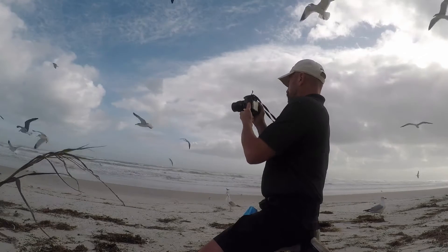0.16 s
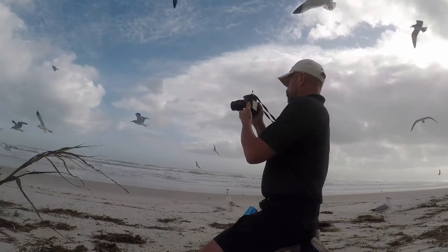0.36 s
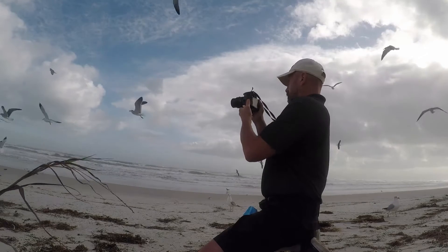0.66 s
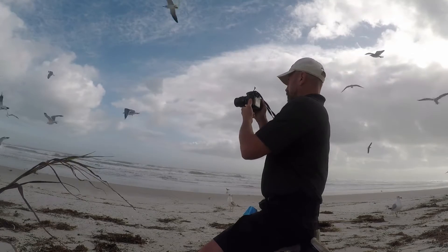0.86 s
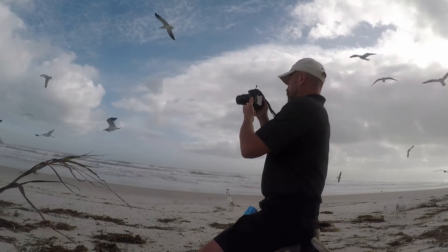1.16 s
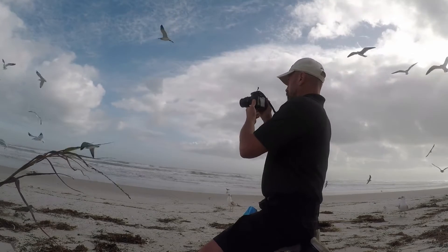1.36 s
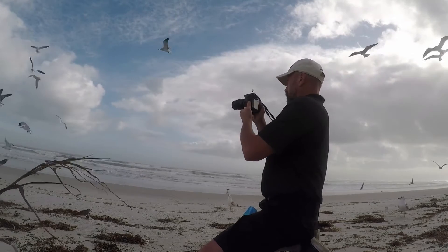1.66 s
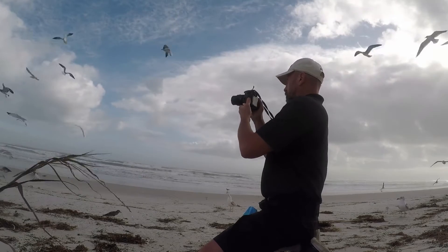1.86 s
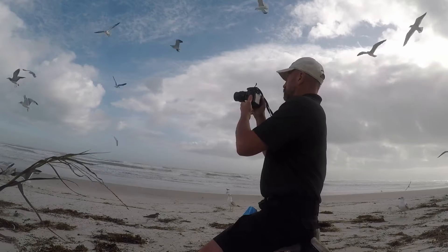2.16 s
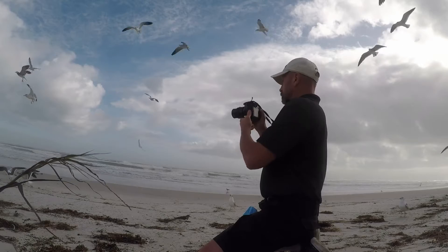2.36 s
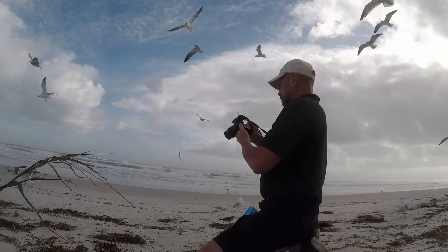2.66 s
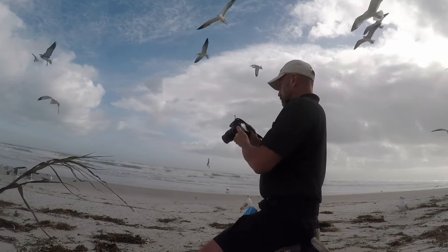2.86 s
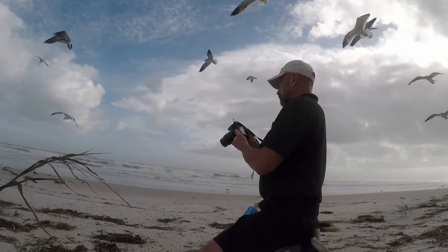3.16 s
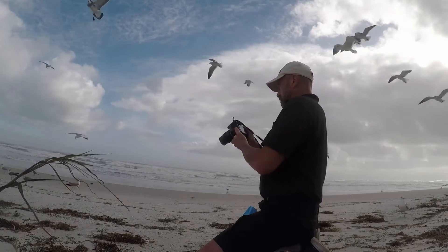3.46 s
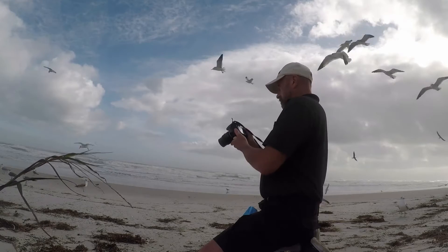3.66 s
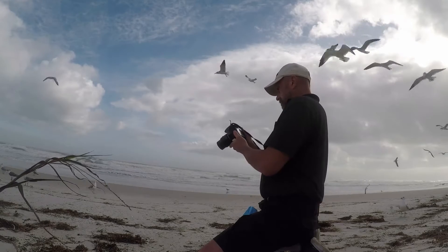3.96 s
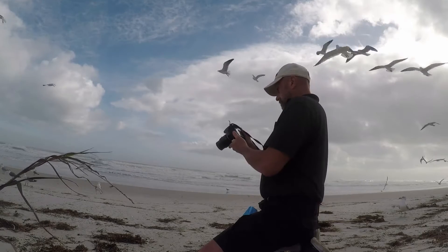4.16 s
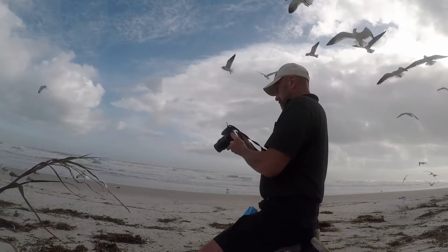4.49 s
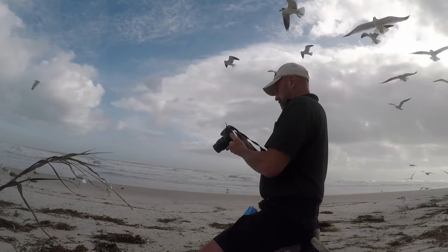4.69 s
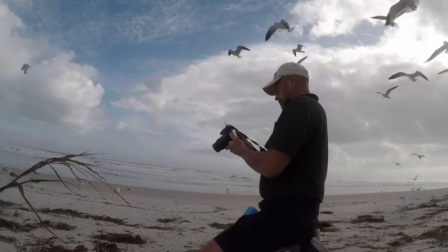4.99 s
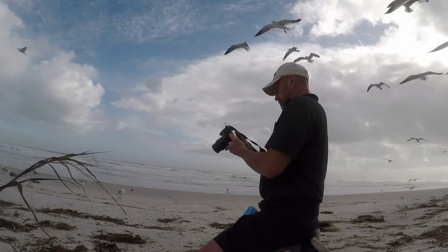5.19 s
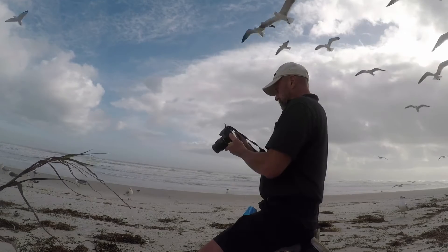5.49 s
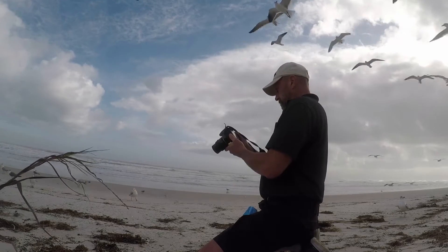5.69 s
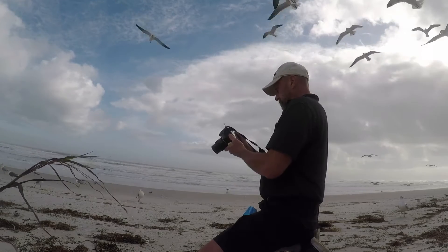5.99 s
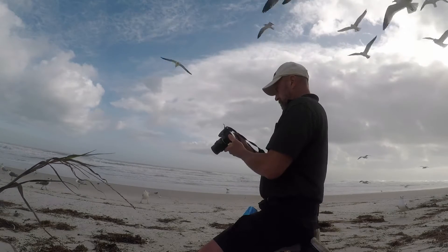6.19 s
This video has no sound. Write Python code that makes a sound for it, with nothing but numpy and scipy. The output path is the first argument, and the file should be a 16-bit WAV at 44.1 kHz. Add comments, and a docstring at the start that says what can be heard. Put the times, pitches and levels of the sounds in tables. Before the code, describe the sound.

A deep, steady roar of distant breakers and wind fills a beach throughout, heard wide in stereo, with a lighter hiss of foam on the sand. From the start a camera shutter clatters in an even burst, about five shots a second, with a faint whirr of gears, stopping at about 2.4 seconds. A nearer wave swells softly at around 0.7 seconds. From 1.4 to 1.9 seconds a gull on the left gives a shrill, breaking squeal. A gull on the right then gives four clear, short, falling cries at about 2, 2.4, 3.3 and 4.6 seconds, the second much fainter and briefer. Two more nearer waves break at about 4.2 and 5.3 seconds, the last one fuller, and the hiss of foam begins to ebb near 6 seconds.

```python
"""A windy beach, heard on a stereo pair: far breakers roar and foam hisses up the sand throughout.
From the start a camera clatters through a burst, five frames a second, and a nearer wave breaks.
At 1.4 s a gull on the left squeals, its voice breaking as the two halves of its syrinx beat.
From 2 s a gull on the right gives four clear falling cries; the camera stops at 2.4 s.
Two more nearer waves break around 4.2 and 5.3 s, and the foam begins to ebb."""
import sys
import numpy as np
from scipy import signal
from scipy.fft import rfft, irfft
from scipy.io import wavfile
from scipy.ndimage import uniform_filter1d, minimum_filter1d

SR = 44100
rng = np.random.default_rng(int(sys.argv[2]) if len(sys.argv) > 2 else 0)


def log_audio(samples):
    """Write samples as a 16-bit WAV file to the path given in sys.argv[1]."""
    # one column per channel
    frames = np.atleast_2d(samples).T
    # limit to full scale, then quantise
    limited = np.clip(frames, -1, 1)
    pcm = np.round(limited * 32767).astype(np.int16)
    wavfile.write(sys.argv[1], SR, pcm)


N = 279594

# deep roar of far breakers and wind: (frequency [Hz], relative density [dB])
ROAR_SPECTRUM = [(11, -47), (18, -12), (86, 1.5), (180, -1.5), (416, -10.5), (1180, -28), (1460, -37),
                 (1700, -40), (2210, -77.5), (3740, -120)]
# hiss of foam on the sand: (frequency [Hz], relative density [dB])
FOAM_SPECTRUM = [(900, -15.5), (1500, -1), (2200, 2), (2900, 0.5), (3600, 1.5), (4800, -2.5), (6000, 0.5),
                 (6700, -3.5), (7700, -9.5), (8200, -20), (9700, -18.5), (11000, -29), (13200, -33.5),
                 (14000, -38.5)]
# the sea at the two microphones: (frequency [Hz], likeness [0-1], left lead [rad], left minus right [dB])
SEA_AT_MICS = [(35, .08, 0, 0), (90, .5, 0, .4), (190, .65, .1, -.7), (350, .85, .2, -1.6),
               (600, .73, .7, -1), (900, .66, 1.1, 4.7), (1200, .52, .7, 6.8), (1900, .38, .4, 3.7),
               (2700, .62, 0, 4.7), (4200, .7, .2, 3.3), (5200, .58, .6, 2), (6500, .68, 1.2, .2),
               (8000, .45, 3, -.5), (10000, .1, 2.6, -1.8)]
# waves breaking nearer by: (peak time [s], level [dB], centre [Hz], spray level [dB], spray centre [Hz])
NEAR_WAVES = [(.65, -27, 950, -45.5, 1970), (4.15, -27.5, 335, -44, 7000), (5.3, -20.5, 332, -47.5, 3900)]
# whirr of the winding gears: (frequency [Hz], relative density [dB])
GEAR_SPECTRUM = [(1200, 13.5), (1900, 11.5), (2800, 6.5), (3600, -18), (6500, -12), (8100, -2),
                 (9000, -3.5), (10500, -19), (12500, -24), (14000, -28)]
# strength of the shutter, frame by frame: (level [dB])
FRAME_LEVELS = [-30, -28.5, -29.5, -30.5, -29.5, -30, -29.5, -30.5, -31, -28, -28, -29.5]
# mirror and curtain impacts in a frame: (delay [s], level [dB], rattle time [s], low mode boost [dB])
SHUTTER_CONTACTS = [(0, -0.5, 0.00073, -6), (.0245, -15.5, 0.00072, 11.5), (.0425, -5.5, .0012, 0.5),
                    (.0685, -13, .001, -9), (.081, -8, .0014, 1), (.0995, -6.5, .0015, 0),
                    (.123, -15, .0007, 3)]
# modes of the camera body: (frequency [Hz], width [Hz], level [dB], left minus right [dB])
BODY_MODES = [(2600, 700, 1.5, 3), (4080, 500, 2.5, 1), (5630, 540, -14, -8), (6580, 390, 2.5, 1.5),
              (7200, 440, -8, -9), (8900, 700, -17.5, -14), (10500, 830, -29, -13), (12600, 1200, -23, -2)]
# the housing's shadow on the far microphone: (frequency [Hz], loss at full side [dB], phase advance [rad])
MIC_SHADOW = [(2400, 20, 1.1), (2800, 20, 0.74), (3600, 21, 1), (4400, 8, 0.44), (5200, -2, -0.29),
              (7600, 5.5, -0.2), (10100, -12.5, -1.54)]
# throat of the squealing gull: (frequency [Hz], gain [dB])
SQUEAL_RESONANCE = [(1800, -12), (2500, 1), (6300, 5), (7300, 8.5), (8300, -33), (11000, -42)]
# notes of a breaking voice: (start [s], length [s], pitch [Hz], bend [Hz], bend lateness [1 = even glide],
# level [dB], fade over the note [dB], beat [Hz], beat depth [0-1], beat delay [s], octave level [dB],
# roughness [0-1], stutter depth [0-1], side [+1 = left])
SQUEAL_NOTES = [(1.427, 0.043, 2740, 44, 0.5, -21.5, -8, 610, 0.37, 0.01, -9, 0.2, 0.3, 0.82),
                (1.444, 0.036, 6650, -450, 1.1, -36.5, -6, 600, .4, 0, -40, 0.7, 0.3, 0.85),
                (1.461, 0.043, 3566, 249, 0.75, -11, 11.5, 530, 0.16, 0, -20, 0.02, 0.25, 0.91),
                (1.464, 0.026, 5490, 230, 3, -25.5, -7, 620, .14, 0, -43, 0.12, 0.1, 0.72),
                (1.5, .094, 6054, 230, 2.9, -13.5, 7, 1100, 0.02, 0, -52, 0.04, 0.1, 0.89),
                (1.59, 0.035, 6300, -62, 1, -28, 14, 1260, .1, 0, -50, 0.1, 0.8, 0.87),
                (1.578, 0.02, 4840, 150, 1, -29, -6, 560, 0.05, 0, -32, 0.2, 0.2, 1),
                (1.593, 0.043, 5030, -400, 6, -29, 0.5, 560, 0.08, 0, -32, 0.35, 0.2, 0.89),
                (1.596, 0.033, 3870, 50, 1, -29.5, 3, 560, 0.05, 0, -32, 0.1, 0.15, 1),
                (1.627, 0.056, 3900, -470, 0.48, -23.5, 0, 550, .02, .0066, -31, 0.1, 0, 0.89),
                (1.686, .028, 3410, 50, 2, -29, -6, 490, 0, 0, -19, 0.1, 0, .72),
                (1.706, 0.16, 3475, -160, 2.36, -23, 13, 490, 0.44, 0.06, -22, 0.12, 0.1, 0.69),
                (1.775, .078, 2480, -110, 1.6, -36, 3, 490, 0, 0, -20, 0.3, 0.3, .72),
                (1.968, 0.022, 4100, 220, 1, -31.5, 1, 418, .5, 0.0074, -17, 0.8, 0.4, -0.47),
                (2.517, 0.12, 4100, -240, 3.7, -39.5, 11, 500, .02, 0, -17, 0.1, 0, -.5),
                (3.239, 0.024, 3950, 499, 3.7, -34.5, -8, 1120, 0.3, 0, -17, .55, 0.1, -.3)]
# throat of the crying gull: (frequency [Hz], gain [dB])
CRY_RESONANCE = [(2150, 5), (2600, 4.5), (4400, -1), (5200, 7), (6700, 0.5), (7300, 4.5), (7900, 1),
                 (9600, -21.5), (10500, -19), (11000, -38), (12800, -43), (13800, -31)]
# clear cries: (start [s], scoop time [s], scoop depth [Hz], time to crest [s], length [s], pitch [Hz],
# crest pitch [Hz], dip [Hz], sag [Hz/s], sag easing time [s], level [dB], crest level [dB], dip [dB],
# fade [dB/s], octave boost [dB], brightness [dB/octave], crest brightness [dB/octave], side [+1 = left])
CRY_NOTES = [(1.979, 0.0082, 150, 0.12, 0.28, 2624, 2630, 61, 4400, 0.52, -23.5, -32, 1, 90, 1, -2.5, 0, -0.29),
             (2.441, 0.029, 424, 0.038, 0.092, 2386, 2375, 10, 2200, .5, -42, -44.5, 1, 110, 7, -6, -3.5, -.5),
             (3.251, 0.0096, 150, .102, 0.34, 2590, 2617, 34.5, 1930, 0.71, -25.5, -26, 0.5, 93, 1, -0.5, 0.5, -0.3),
             (4.6, 0.024, 224, 0.15, 0.286, 2535, 2556, 50, 4400, 0.256, -24.5, -26, 3, 144, 1, -1, 0.5, -0.21)]

FIRST_FRAME_S, FRAME_PERIOD_S = .0865, .1968
SIDES = np.array([[1], [-1]])   # left and right microphone


def from_db(db):
    """Decibels as amplitude."""
    return 10 ** (np.asarray(db) / 20)


def rms_one(x):
    """The signal scaled to rms 1."""
    return x / np.sqrt(np.mean(x ** 2) + 1e-20)


def at_hz(points, hz):
    """The columns of a spectrum at the frequencies hz."""
    f, *columns = np.transpose(points)
    return [np.interp(np.log(np.maximum(hz, 1)), np.log(f), c) for c in columns]


def bandpass(low_hz, high_hz):
    """A gentle band filter."""
    return signal.butter(2, [low_hz, high_hz], "band", fs=SR, output="sos")


def drift(rate, size):
    """A smooth random wander of spread 1 that changes about rate times a second."""
    hz = np.fft.rfftfreq(2 * SR + size, 1 / SR)
    white = rfft(rng.standard_normal(2 * SR + size))
    return rms_one(irfft(white / (1 + (hz / rate) ** 2)))[:size]


def span_of(start, length, attack_s, release_s):
    """Samples of an event, the time since its start, and a gate that opens and closes smoothly."""
    t = np.arange(int(length * SR)) / SR
    opening = np.clip(np.minimum(t / attack_s, (length - t) / release_s), 0, 1)
    return int(start * SR) + np.arange(len(t)), t, np.sin(np.pi / 2 * opening) ** 2


def sea_noise(spectrum):
    """Noise from a wide shore: one part reaches both microphones, the rest is each one's own."""
    hz = np.fft.rfftfreq(N, 1 / SR)
    alike, lead, balance_db = at_hz(SEA_AT_MICS, hz)
    white = rfft(rng.standard_normal((3, N)))
    shared = np.sqrt(alike) * white[2] * np.exp(.5j * lead * SIDES)
    own = np.sqrt(1 - alike) * white[:2]
    colour = from_db(at_hz(spectrum, hz)[0] + .5 * balance_db * SIDES)
    return rms_one(irfft((shared + own) * colour, N))


def surf(roar_db=-13.5, swell_db=.68, foam_db=-37, surge_db=.6, ebb_from_s=5.73, ebb_db_per_s=3.5):
    """Breakers roar far out; foam hisses up the sand, then dies down as the wave draws back."""
    ebb_db = ebb_db_per_s * np.maximum(np.arange(N) / SR - ebb_from_s, 0)
    roar = from_db(roar_db + swell_db * drift(.8, N)) * sea_noise(ROAR_SPECTRUM)
    foam = from_db(foam_db - ebb_db + surge_db * drift(25, N)) * sea_noise(FOAM_SPECTRUM)
    return roar + foam


def near_waves(swell_s=.36, spray_ratio=1.42):
    """Closer to the microphones, each wave swells, throws a hiss of spray and sinks again."""
    t, out = np.arange(N) / SR, np.zeros((2, N))
    water, froth = sea_noise(ROAR_SPECTRUM), sea_noise(FOAM_SPECTRUM)
    for peak_s, level_db, centre_hz, spray_db, spray_hz in NEAR_WAVES:
        rush = rms_one(signal.sosfilt(bandpass(centre_hz / 2, centre_hz * 2), water))
        spray = rms_one(signal.sosfilt(bandpass(spray_hz / spray_ratio, spray_hz * spray_ratio), froth))
        swell = np.exp(-.5 * ((t - peak_s) / swell_s) ** 2)
        out += swell * (from_db(level_db) * rush + from_db(spray_db) * spray)
    return out


def gears(level_db=-42, grain_db=3, delay_s=.004, winding_s=.125):
    """A small motor winds the camera during each frame, with a fine grainy whirr."""
    hz, running = np.fft.rfftfreq(N, 1 / SR), np.zeros(N)
    for start in FIRST_FRAME_S + FRAME_PERIOD_S * np.arange(len(FRAME_LEVELS)):
        at, _, gate = span_of(start + delay_s, winding_s, attack_s=.013, release_s=.018)
        running[at] += gate
    teeth = rng.standard_normal((2, N)) * from_db(grain_db * drift(400, N))
    whirr = irfft(rfft(teeth) * from_db(at_hz(GEAR_SPECTRUM, hz)[0]), N)
    return from_db(level_db) * running * rms_one(whirr)


def shutter(detune=.018, low_below_hz=5000, spread_db=1.2):
    """Each frame is the same chain of small impacts; each briefly rings every mode of the camera body."""
    t, out = np.arange(SR // 60) / SR, np.zeros((2, N))
    for frame, frame_db in enumerate(FRAME_LEVELS):
        start = FIRST_FRAME_S + FRAME_PERIOD_S * frame
        for delay, contact_db, rattle_s, low_db in SHUTTER_CONTACTS:
            at = int((start + delay) * SR)
            impact = from_db(frame_db + contact_db) * t / rattle_s * np.exp(1 - t / rattle_s)
            for hz, width, mode_db, pan_db in BODY_MODES:
                # loose parts rattle, so the phase wanders and the mode is broad
                walk = np.cumsum(rng.standard_normal((2, len(t))), axis=1)
                wander = uniform_filter1d(walk * np.sqrt(2 * np.pi * width / SR), size=24, axis=1)
                ring_hz = hz * (1 + detune * rng.standard_normal())
                phase = 2 * np.pi * (ring_hz * t + rng.random((2, 1))) + wander
                ring_db = mode_db + low_db * (hz < low_below_hz) + spread_db * rng.standard_normal()
                out[:, at:at + len(t)] += from_db(ring_db + .5 * pan_db * SIDES) * impact * np.sin(phase)
    return out


def beach_scatter(x, echo_db=-27, t60_s=.3):
    """Sand and dune add a faint, short tail to the direct sound."""
    t = np.arange(SR // 2) / SR
    tail = rng.standard_normal((2, len(t))) * from_db(-60 * t / t60_s)
    tail /= np.sqrt(np.sum(tail ** 2, axis=1, keepdims=True))
    return x + from_db(echo_db) * signal.fftconvolve(x, tail, axes=1)[:, :N]


def partial(hz, side, right_lag_s):
    """One gliding line at the pair: the far microphone hears it later and in the housing's shadow."""
    phase = 2 * np.pi * (np.cumsum(hz) / SR + rng.random())
    shade_db, advance = at_hz(MIC_SHADOW, hz)
    right_phase = phase - 2 * np.pi * hz * right_lag_s + np.sign(side) * advance
    left = from_db(-shade_db * max(-side, 0)) * np.sin(phase)
    right = from_db(-shade_db * max(side, 0)) * np.sin(right_phase)
    return np.array([left, right])


def gull_squeals(jitter=.058, rasp=.51, flutter=.82, hoarse_db=-4, stutter_hz=86.6,
                 beat_rise_s=.0037, line_fall_db=5):
    """Mostly left: the voice jumps registers; the syrinx's other half beats with it, adding side lines."""
    out = np.zeros((2, N))
    beak = np.vstack([bandpass(4600, 7300)] * 2)
    for (start, length, pitch_hz, bend_hz, lateness, level_db, fade_db,
         beat_hz, beat_depth, beat_from_s, octave_db, rough, stutter, side) in SQUEAL_NOTES:
        at, t, gate = span_of(start, length, attack_s=.0091, release_s=.0074)
        progress = t / length
        pitch = (pitch_hz + bend_hz * progress ** lateness) * (1 + jitter * rough * drift(460, len(t)))
        beat = beat_hz * (1 + jitter * rough * drift(300, len(t)))
        # an unsteady second voice makes the side lines flutter
        depth = beat_depth * np.clip((t - beat_from_s) / beat_rise_s, 0, 1)
        depth = np.clip(depth * (1 + flutter * rough * drift(110, len(t))), 0, 1)
        loud = gate * from_db(level_db - fade_db * progress) * (1 + rasp * rough * drift(900, len(t)))
        # the voice catches in quick pulses as it changes register
        loud *= 1 - stutter * np.cos(2 * np.pi * stutter_hz * t)
        for harmonic, weight in ((1, .89), (2, from_db(octave_db))):
            for line in range(-2, 3):
                hz = harmonic * pitch + line * beat
                share = depth * from_db(-line_fall_db * (abs(line) - .5)) if line else 1
                gain = weight * share * from_db(at_hz(SQUEAL_RESONANCE, hz)[0])
                out[:, at] += loud * gain * partial(hz, side, right_lag_s=50e-6 * side)
        # where the voice is rough, turbulent air fills the gaps between the lines
        breath = rms_one(signal.sosfilt(beak, rng.standard_normal((2, len(t)))))
        out[:, at] += loud * rough * from_db(hoarse_db) * breath
    return out


def gull_cries(dip_s=.032, knee_s=.014, tiring_s=.045, jitter=.0025, waver=.0066,
               shimmer_db=.7, tremble_db=.5, dulling_db_per_octave_s=20):
    """Overhead right: the syrinx sings a clean tone that scoops up, slackens, crests, sags and fades."""
    out = np.zeros((2, N))
    for (start, scoop_s, scoop_hz, crest_s, length, first_hz, crest_hz, dip_hz, sag, ease_s, first_db,
         crest_db, dip_db, fade, octave_db, first_bright_db, crest_bright_db, side) in CRY_NOTES:
        at, t, gate = span_of(start, length, attack_s=.018, release_s=.026)
        scoop = np.maximum(1 - t / scoop_s, 0) ** 2
        held = np.maximum(t - scoop_s, 0) / dip_s
        dip = (held * np.exp(1 - held)) ** 3
        falling_s = np.hypot(np.maximum(t - crest_s, 0), knee_s) - knee_s   # rounds over the crest
        sag_hz = sag * ease_s * (1 - np.exp(-falling_s / ease_s))
        tired = np.clip(falling_s / tiring_s, 0, 1)   # the tone grows unsteady as it sags
        pitch = np.interp(t, [0, crest_s], [first_hz, crest_hz])
        pitch -= scoop_hz * scoop + dip_hz * dip + sag_hz
        pitch *= 1 + jitter * drift(120, len(t)) + waver * tired * drift(55, len(t))
        level_db = np.interp(t, [0, crest_s], [first_db, crest_db]) - dip_db * dip - fade * falling_s
        level_db += (shimmer_db + tremble_db * tired) * drift(70, len(t))
        bright_db = np.interp(t, [0, crest_s], [first_bright_db, crest_bright_db])
        bright_db -= dulling_db_per_octave_s * falling_s   # overtones fade before the fundamental
        for harmonic in range(1, 6):
            hz = harmonic * pitch
            colour_db = at_hz(CRY_RESONANCE, hz)[0] + bright_db * np.log2(harmonic / 2)
            colour_db += octave_db * (harmonic == 2)
            out[:, at] += gate * from_db(level_db + colour_db) * partial(hz, side, right_lag_s=-37e-6)
    return out


def scene():
    """Sea, gulls and camera at the microphones; only the gulls carry the scatter off the beach."""
    return surf() + beach_scatter(gull_cries() + gull_squeals()) + shutter() + gears() + near_waves()


def record(dry, ceiling=.8, cutoff_hz=14100):
    """The recorder's limiter dips smoothly around peaks over the ceiling; the top is then cut steeply."""
    needed_gain = np.minimum(1, ceiling / (np.abs(dry).max(axis=0) + 1e-9))
    gain = uniform_filter1d(minimum_filter1d(needed_gain, size=401), size=401)
    lowpass = signal.ellip(10, .1, 90, cutoff_hz, fs=SR, output="sos")
    return signal.sosfilt(lowpass, dry * gain)


dry = scene()
out = record(dry)
log_audio(out)
```